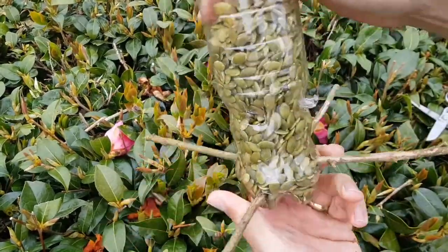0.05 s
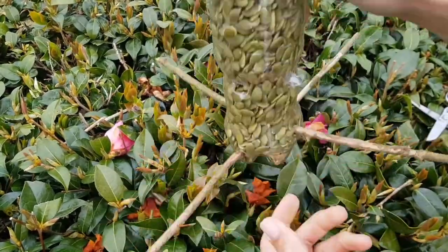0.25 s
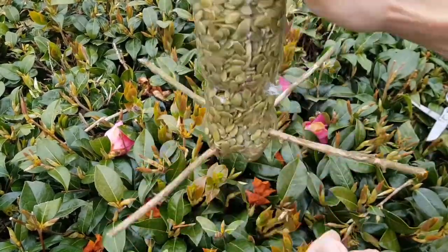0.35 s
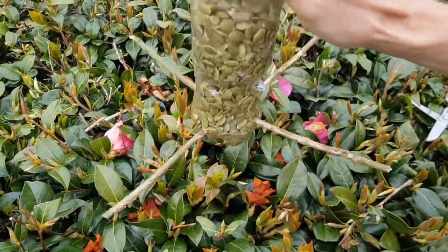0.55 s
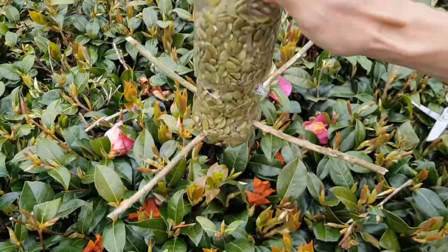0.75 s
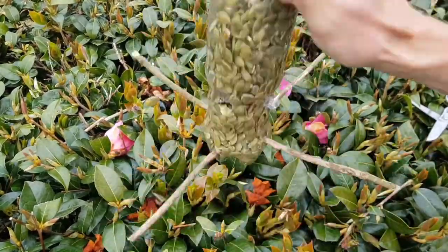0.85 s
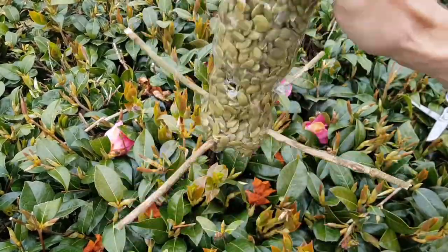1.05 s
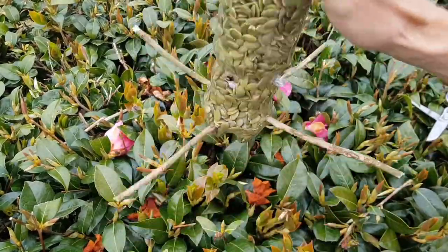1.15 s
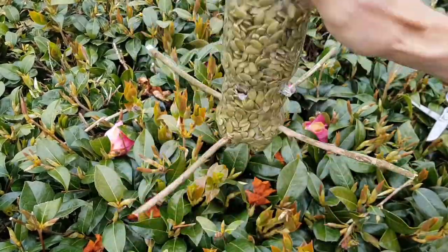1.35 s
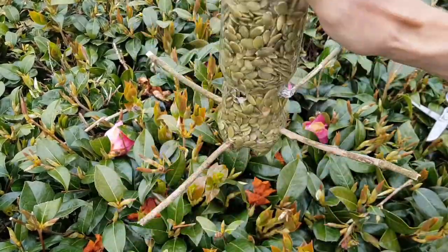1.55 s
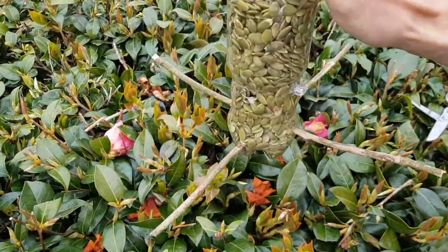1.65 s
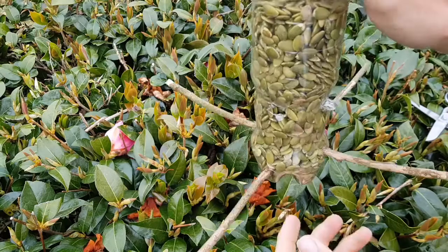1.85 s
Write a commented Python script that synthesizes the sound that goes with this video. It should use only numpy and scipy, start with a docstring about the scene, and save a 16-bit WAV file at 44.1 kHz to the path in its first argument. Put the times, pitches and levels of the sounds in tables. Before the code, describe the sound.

Quick rhythmic rattle of pumpkin seeds shaken up and down in a plastic bottle outdoors.

```python
"""Pumpkin seeds in a plastic bottle, shaken up and down about five times a second, close up, outdoors.
On each stroke the seeds slide up the wall with a bright swish, then land in a heap with a fuller crash;
thousands of tiny collisions ring the bottle. The plastic ticks and squeaks in the hand, over a faint
distant hum and soft open air."""
import sys
import numpy as np
from scipy import signal
from scipy.fft import rfft, irfft
from scipy.io import wavfile
from scipy.ndimage import uniform_filter1d

SR = 44100
rng = np.random.default_rng(int(sys.argv[2]) if len(sys.argv) > 2 else 0)


def pcm_store(signal):
    """Save signal as 16-bit PCM."""
    levels = np.round(np.clip(np.atleast_2d(signal), -1, 1) * 32767)
    wavfile.write(sys.argv[1], SR, levels.astype(np.int16).T)


N = 83790
FFT_SIZE = 98304
SIDES = np.array([[1], [-1]])  # left up, right down


def seed_slides(per_s=7000):
    """Seeds skid along the wall: a bright swish of dense clicks on each stroke."""
    # swishes: peak_s, level_db, rise_s, fall_s
    strokes = [(0.268, -36.5, 0.0085, 0.01), (0.470, -42, .012, .015), (0.598, -30, .026, 0.035),
               (0.735, -45, .015, 0.013), (0.799, -28.5, 0.022, 0.034), (1.002, -28.5, 0.028, 0.033),
               (1.197, -30.5, 0.02, .035), (1.378, -31, 0.021, 0.058)]
    # tone of the swish: frequency_hz, relative_db
    swish_tone = [(120, -56), (280, -26.5), (420, -13.5), (900, -5.5), (1400, -15), (2200, 0), (4000, 1),
                  (6300, -3), (8400, -8.5), (11500, -10.5), (15800, -20)]
    return collisions(swells(strokes), per_s, spread_db=4.5, response=colour(swish_tone), spots=3)


def seed_landings(per_s=5200, left_db=1):
    """The heap thuds on the base just ahead of its crash, and the wall rings on after it."""
    # crashes: peak_s, level_db, rise_s, fall_s
    landings = [(0.250, -36, 0.021, 0.04), (0.445, -29.5, 0.023, 0.036), (0.665, -24.5, 0.028, 0.025),
                (0.858, -21, 0.022, 0.024), (1.066, -25.5, 0.027, 0.031), (1.257, -23.5, 0.019, .03),
                (1.447, -24.5, 0.027, 0.027)]
    # tone of the full crash: frequency_hz, relative_db
    crash_tone = [(120, -42), (250, -24.5), (420, -15.5), (900, -10.5), (1400, -6), (2300, 0.5),
                  (4000, 0.5), (6300, -2.5), (8400, -12.5), (11500, -13), (15800, -23.5)]
    # tone of the dull thud: frequency_hz, relative_db
    thud_tone = [(110, -13), (240, -17), (400, -5), (850, 0), (1400, -3.5), (2500, -19), (8000, -47)]
    thud_swell = swells(landings, delay_s=-0.008, gain_db=-18.5)
    wall_swell = swells(landings, delay_s=0.011, gain_db=5.5)
    crash = collisions(swells(landings), per_s, spread_db=3, response=colour(crash_tone), spots=3)
    thud = collisions(thud_swell, per_s, spread_db=2.5, response=colour(thud_tone))
    wall = collisions(wall_swell, per_s, spread_db=4.5, response=resonance(hz=2216, q=11))
    return (crash + thud + wall) * undb(SIDES * left_db / 2)


def seed_rustle(per_s=5200):
    """Loose seeds rustle, swelling with each slide and fading after the shaking stops."""
    # rustle envelope: time_s, level_db
    envelope = [(0, -73.5), (0.139, -68), (.18, -55), (.22, -55.5), (.33, -67.5), (.37, -44), (.42, -48.5),
                (0.531, -64), (0.573, -41.5), (0.701, -46), (.75, -48), (0.778, -41.5), (.925, -65),
                (0.954, -38.5), (1.02, -41.5), (1.14, -48), (1.19, -41.5), (1.319, -52), (1.368, -39),
                (1.501, -45.5), (1.555, -61.5), (1.9, -78.5)]
    # tone of the rustle: frequency_hz, relative_db
    rustle_tone = [(120, -41.5), (400, -2), (1200, 3), (2200, 7.5), (4500, 5.5), (6500, -5.5), (8500, -13),
                   (15800, -23.5)]
    strength = undb(np.interp(np.arange(N) / SR, *np.array(envelope).T))
    return collisions(strength, per_s, spread_db=5.5, response=colour(rustle_tone))


def collisions(strength, per_s, spread_db, response, spots=1):
    """Seeds collide in random one-cycle clicks; stronger motion makes them denser and harder."""
    rings = [resonance(hz, q=0.67) for hz in (900, 1800, 3000, 4500, 7000, 12000)]
    joint_gain = np.sqrt(sum(abs(ring) ** 2 for ring in rings))
    density = (strength / strength.max()) ** 0.7
    chance = np.clip(per_s / len(rings) / spots / SR * density, 1 / N, 1)
    size = unit(undb(spread_db * np.clip(rng.standard_normal(N), -2, 2))) * rng.choice([-1, 1], N)
    spectrum = 0
    for ring in rings:
        heard = 0
        for _ in range(spots):
            clicks = (rng.random(N) < chance) * size * strength / np.sqrt(chance * spots)
            heard = heard + signal.oaconvolve(clicks[None], inner_scatter(scatter_db=-1.5), axes=1)
        spectrum = spectrum + rfft(heard, FFT_SIZE) * ring / joint_gain
    return irfft(spectrum * response)[:, :N]


def inner_scatter(scatter_db, size=1536, t60_s=0.016, wide_above_hz=770):
    """Stereo response of one random spot in the bottle: a direct click, then a brief scatter."""
    t = (np.arange(size) - 8) / SR
    right_lag_s = 40e-6 + 25e-6 * rng.standard_normal()
    direct = np.sinc((t - np.array([[0], [right_lag_s]])) * SR)
    noise = rng.standard_normal((3, size))
    centre = signal.lfilter(*signal.butter(1, wide_above_hz, fs=SR), noise[0])
    wide = signal.lfilter(*signal.butter(1, wide_above_hz, "high", fs=SR), noise[1:])
    decay = (t > 0) * np.exp(-np.log(1000) * t / t60_s)
    scatter = unit((centre + wide) * decay) / np.sqrt(size)
    return (direct + undb(scatter_db) * scatter) / np.hypot(1, undb(scatter_db))


def bottle(x):
    """Every click rings the bottle, which sounds louder on the left."""
    # bottle resonances: pitch_hz, t60_s, gain_db
    modes = [(464, 0.12, -11), (1578, 0.032, -4.5), (1780, 0.15, -6.5), (2120, .07, -27.5),
             (3130, 0.048, -13), (3940, 0.04, -14), (4800, 0.036, -12)]
    # stereo balance: frequency_hz, left_minus_right_db
    balance = [(200, 2), (1000, 2), (2500, 3), (3100, 0.7), (4000, 5.5), (6200, 3), (8000, -1), (10000, -1),
               (15000, 0.5)]
    body = 1 + sum(undb(db) * resonance(hz, np.pi * hz * t60 / np.log(1000)) for hz, t60, db in modes)
    return filtered(x, body * undb(SIDES * along(balance) / 2))


def wall_ticks(gain_db=9.5, treble_hz=4700):
    """Single hard clicks on the plastic wall, each with its own brightness."""
    # ticks of seeds and plastic: start_s, relative_db, treble_db
    ticks = [(0.0951, -41.5, 3), (0.1660, -38.5, 5), (0.229, -19, -20), (0.2432, -7.5, -21),
             (0.2515, -26, 1.5), (0.3305, -41, -12), (0.355, -29.5, -7), (0.405, -24.5, -1),
             (0.442, -13, -3), (0.4688, -19, 5), (0.738, -31, 7), (0.761, -14.5, -29), (0.799, -25.5, 19.5),
             (0.9374, -45, -8.5), (0.9450, -24, -25), (1.111, -22.5, -5), (1.1189, -15.5, 0),
             (1.1254, -30, -12.5), (1.302, -22, 9), (1.323, -24, -14), (1.342, -40, 6), (1.492, -24.5, 6.5),
             (1.505, -27.5, 3.5), (1.5722, -31.5, -4), (1.5915, -29.5, -3.5), (1.5964, -35.5, -9.5),
             (1.6442, -50.5, 13), (1.7580, -64, 19), (1.851, -55.5, 15.5)]
    # tone of the ticks: frequency_hz, relative_db
    tick_tone = [(120, -42), (300, -47), (800, -15), (2000, 4), (4000, 3), (6500, 1), (8500, -11.5),
                 (15800, -13)]
    body, treble = np.zeros((2, 2, N))
    for at, db, treble_db in ticks:
        start = int(at * SR)
        click = undb(db + gain_db) * inner_scatter(scatter_db=6)[:, :N - start]
        span = slice(start, start + click.shape[1])
        body[:, span] += click
        treble[:, span] += undb(treble_db) * click
    low = 1 / (1 + 1j * freqs() / treble_hz)
    return filtered(filtered(body, low) + filtered(treble, 1 - low), colour(tick_tone))


def squeak():
    """The plastic gives a faint falling squeak in the hand just before the shaking."""
    # squeak contour: time_s, pitch_hz, level_db
    glide = [(.108, 4590, -72), (.128, 4530, -59), (.142, 4490, -68), (0.167, 4270, -72)]
    t = np.arange(N) / SR
    at, hz, db = np.array(glide).T
    pitch = np.interp(t, at, hz) * (1 + 0.013 * drift(rate_hz=500))
    return sine(pitch) * np.interp(t, at, undb(db), left=0, right=0)


def outdoors(waver_hz=1.23, rumble_db=-55, air_db=-64):
    """A distant machine hums and rumbles under soft open-air noise."""
    # hum partials: pitch_hz, level_db
    partials = [(53.8, -60.5), (102.3, -67), (123.8, -59)]
    # tone of the rumble: frequency_hz, relative_db
    rumble_tone = [(20, -21), (38, -32), (48, -6), (80, -4.5), (130, -13), (155, -18), (260, -30),
                   (600, -48.5)]
    # tone of the air: frequency_hz, relative_db
    air_tone = [(100, -4), (200, -5), (330, -2.5), (450, -22), (600, 3), (720, -5.5), (900, -1),
                (1300, -12.5), (3000, -21.5), (7000, -18), (15800, -48)]
    hum = sum(undb(db) * sine(hz + waver_hz * drift(rate_hz=5.6)) for hz, db in partials)
    noise = rng.standard_normal((4, N))
    rumble = filtered(noise[0] + undb(-16) * SIDES * noise[1], colour(rumble_tone))  # nearly mono
    air = filtered(noise[2] + undb(-5) * SIDES * noise[3], colour(air_tone))  # wider
    return hum + undb(rumble_db) * rumble + undb(air_db) * air


def swells(table, delay_s=0, gain_db=0):
    """Strength over time: each row rises to its peak and dies away."""
    t, power = np.arange(N) / SR, 0
    for at, db, rise, fall in table:
        peak_s = at + delay_s
        away = abs(t - peak_s) / np.where(t < peak_s, rise, fall)
        power = power + (undb(db + gain_db) * np.exp(-away ** 1.66)) ** 2
    return np.sqrt(power) + 1e-9


def drift(rate_hz):
    """Smooth random wander of rms 1."""
    hold = int(SR / rate_hz)
    steps = np.repeat(rng.standard_normal(N // hold + 1), hold)
    return unit(uniform_filter1d(steps, hold)[:N])


def sine(pitch_hz):
    """Tone of rms 1 that follows a pitch curve."""
    return np.sqrt(2) * np.sin(2 * np.pi * np.cumsum(pitch_hz) / SR)


def resonance(hz, q):
    """Band-pass response, gain 1 at the centre."""
    return 1 / (1 + 1j * q * (freqs() / hz - hz / freqs()))


def colour(points):
    """Minimum-phase EQ of unit power, shaped by (Hz, dB) points."""
    cepstrum = irfft(np.log(undb(along(points))))
    cepstrum[1:FFT_SIZE // 2] *= 2
    cepstrum[FFT_SIZE // 2 + 1:] = 0
    response = np.exp(rfft(cepstrum))
    return response / np.sqrt(np.mean(abs(response) ** 2))


def along(points):
    """(Hz, dB) points joined on a log-frequency axis."""
    hz, db = np.array(points, float).T
    return np.interp(np.log(freqs()), np.log(hz), db)


def filtered(x, response):
    """Apply a frequency response."""
    return irfft(rfft(x, FFT_SIZE) * response)[..., :N]


def freqs():
    """Frequency axis of the filters, in Hz."""
    return np.maximum(np.arange(FFT_SIZE // 2 + 1) * SR / FFT_SIZE, 1)


def undb(db):
    """Decibels to gain."""
    return 10 ** (np.asarray(db) / 20)


def unit(x):
    """Scale to rms 1."""
    return x / np.sqrt(np.mean(x ** 2))


def scene():
    """Seeds and ticks ring the bottle, with one squeak, over a quiet outdoor bed."""
    seeds = seed_slides() + seed_landings() + seed_rustle()
    return bottle(seeds + wall_ticks()) + squeak() + outdoors()


def record(dry):
    """A steep low-pass trims the highest treble."""
    cutoff_hz = 15850
    return signal.sosfilt(signal.ellip(10, .2, 80, cutoff_hz, fs=SR, output="sos"), dry)


dry = scene()
out = record(dry)
pcm_store(out)
```